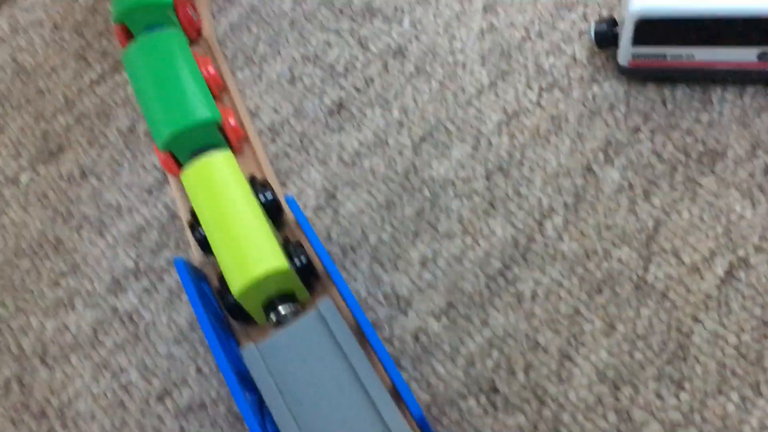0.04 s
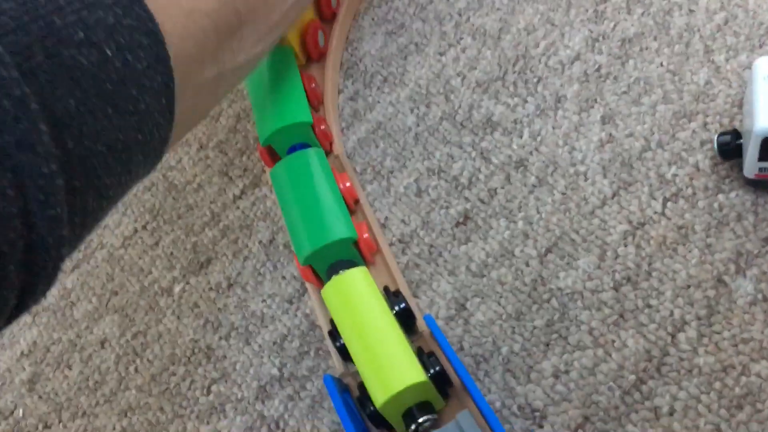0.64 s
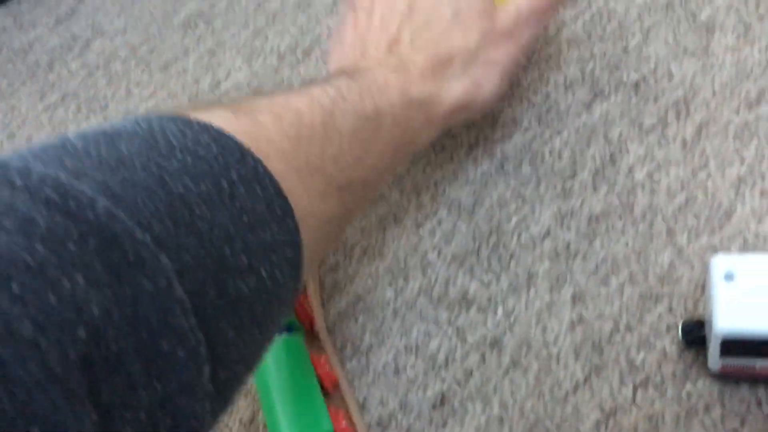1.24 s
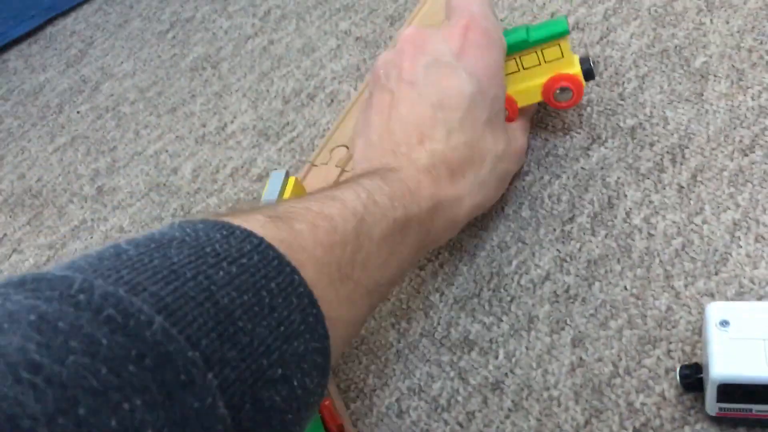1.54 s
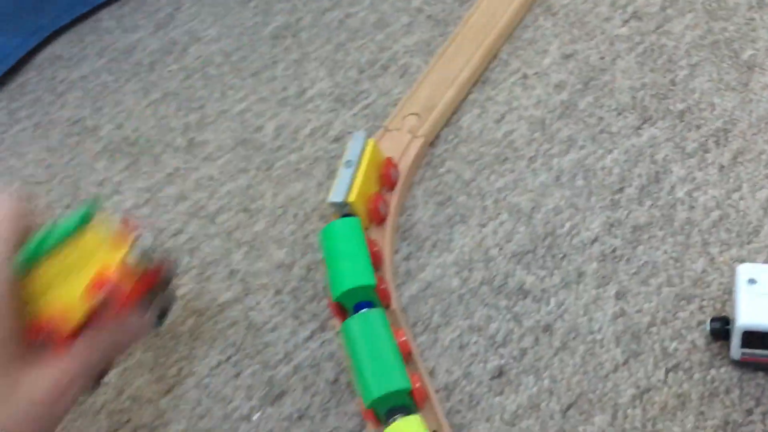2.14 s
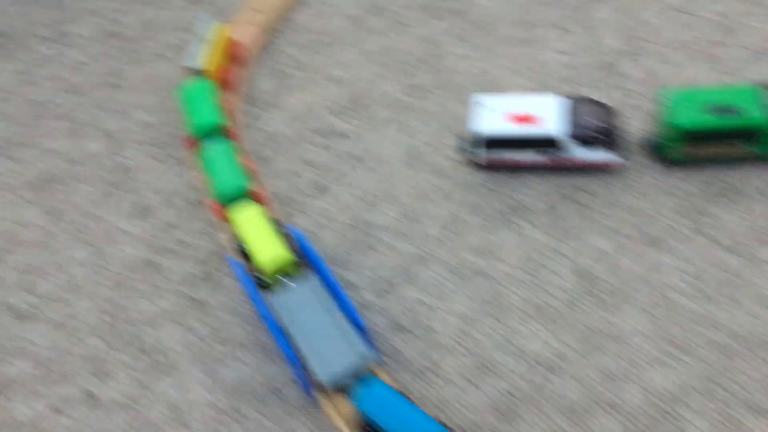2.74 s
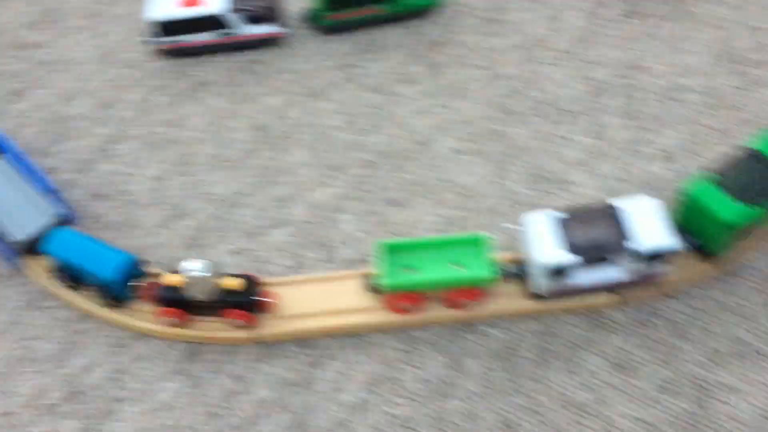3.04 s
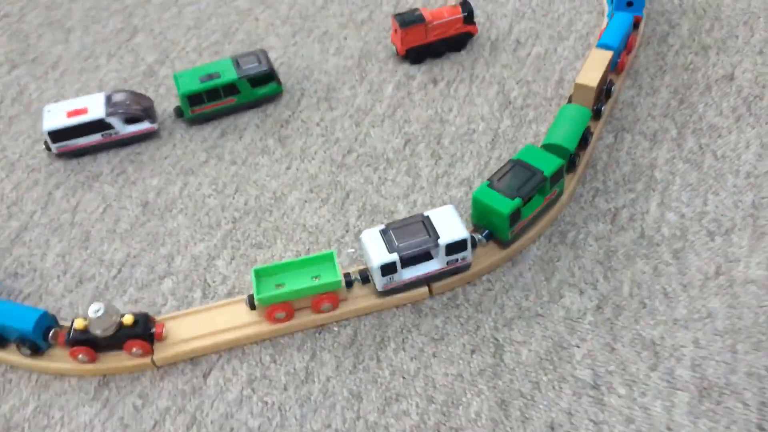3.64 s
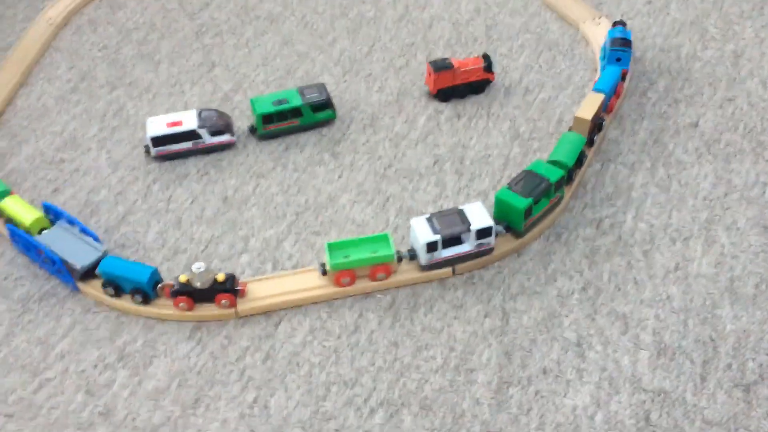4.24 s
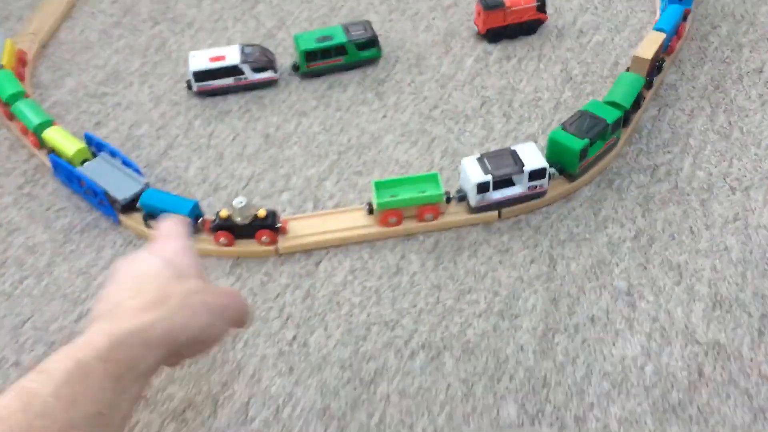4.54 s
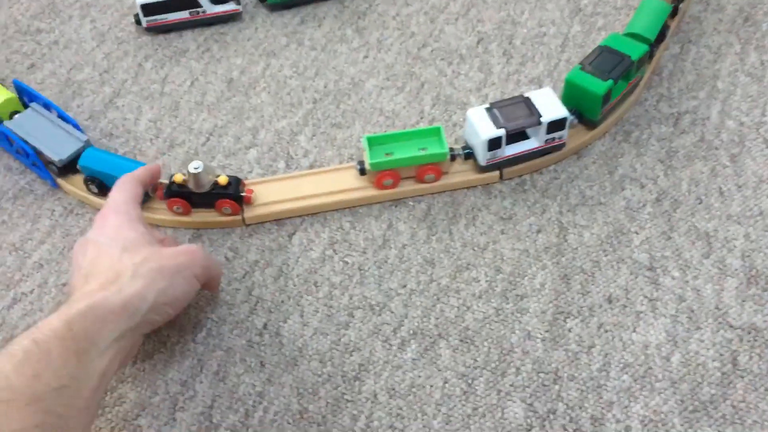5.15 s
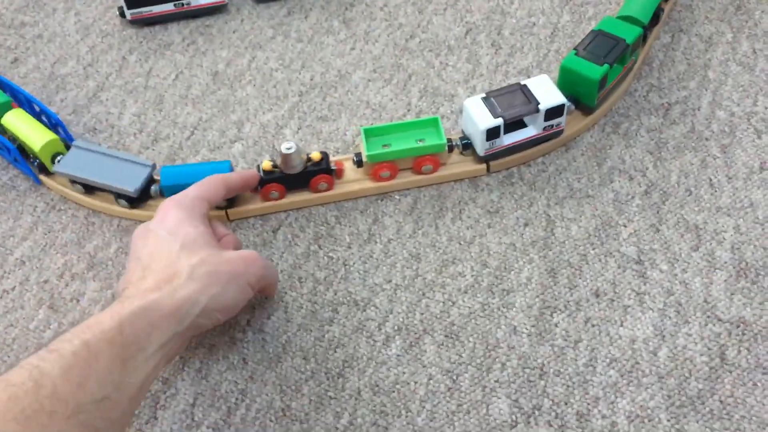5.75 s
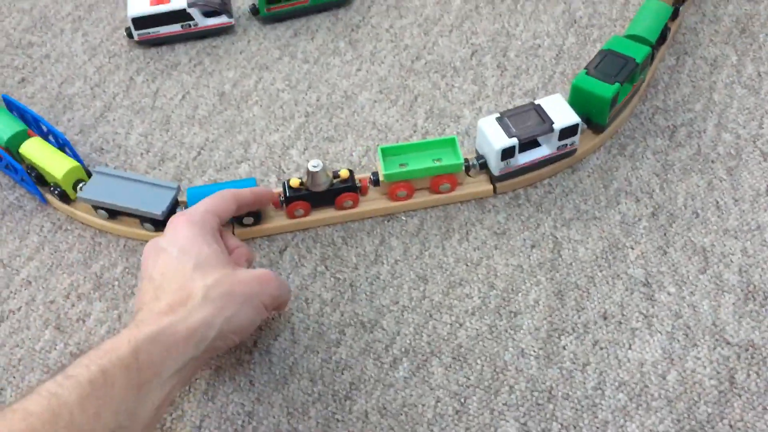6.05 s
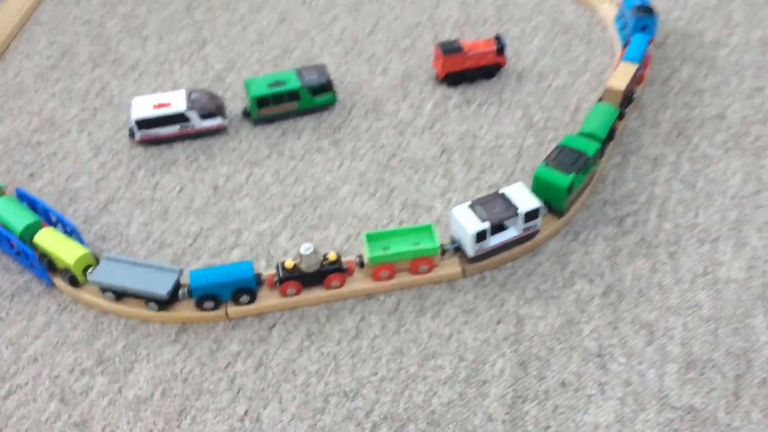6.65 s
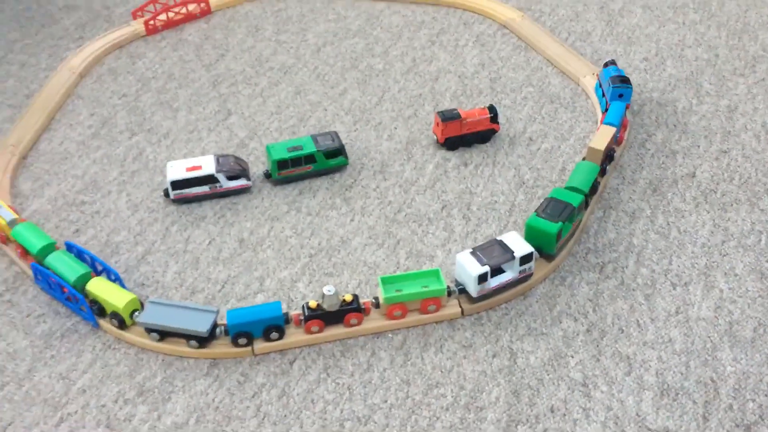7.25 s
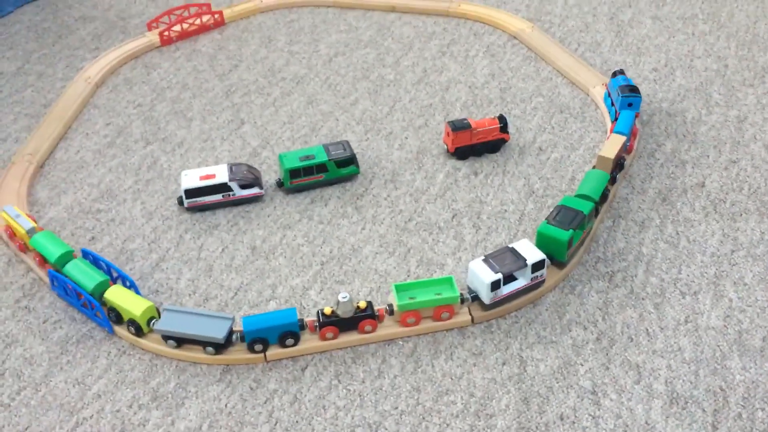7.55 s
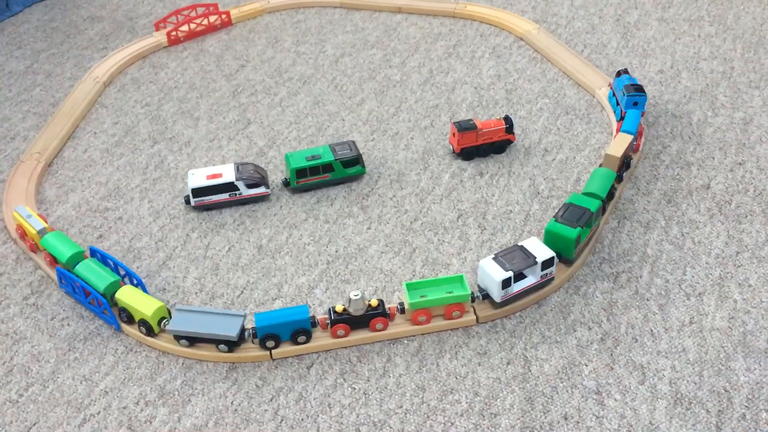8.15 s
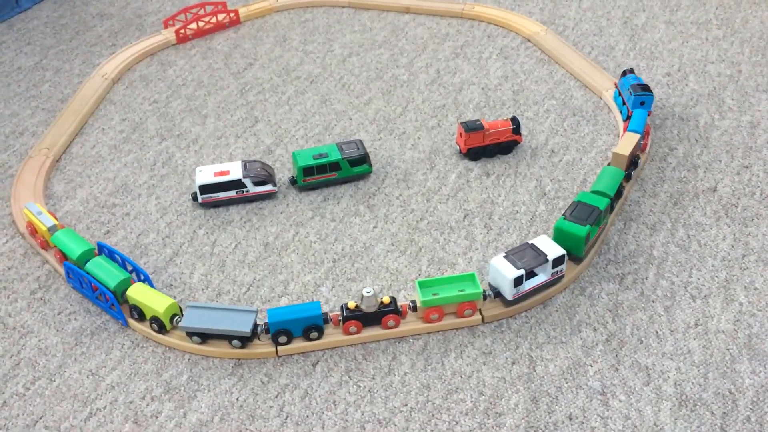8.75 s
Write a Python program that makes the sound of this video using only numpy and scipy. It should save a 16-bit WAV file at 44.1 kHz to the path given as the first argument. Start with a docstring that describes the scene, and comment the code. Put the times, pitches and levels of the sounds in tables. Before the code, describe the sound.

Close wooden toy train cars knock and rattle, then, after faint clothing rustle, roll briefly and click together magnetically.

```python
"""Wooden toy carriages clatter on a wooden track, close by in a carpeted room where a far clock ticks.
One is lifted and, at about 2.5 seconds, set down again. An axle squeaks faintly, then clothes
rustle as the player shifts, with soft bumps. From about 5 seconds the carriages are pushed together:
wheels rumble along the groove, wood knocks, and magnets snap shut and ring.
After a last rustle and two more bumps, only the clock, still air and a faint rumble are left."""
import sys
import numpy as np
from scipy import signal
from scipy.fft import rfft, irfft, next_fast_len
from scipy.io import wavfile

SR = 44100
rng = np.random.default_rng(int(sys.argv[2]) if len(sys.argv) > 2 else 0)


def to_wav(s):
    """Save 16-bit WAV."""
    ch = np.atleast_2d(s).T  # columns
    pcm = np.round(np.clip(ch, -1, 1) * 32767)  # PCM
    wavfile.write(sys.argv[1], SR, pcm.astype(np.int16))


N = 397341
TIME = np.arange(N) / SR

# The tone of still air. Each row: frequency in Hz, relative level in dB.
AIR_TONE = [(25, -7), (75, 0), (140, -5.5), (250, -9), (500, -16.5), (1000, -21), (1700, -21),
            (2200, -20.5), (2800, -24.5), (3700, -23), (4900, -30.5), (5900, -27), (10400, -31),
            (16000, -32)]
# Swells of a faint low rumble. Each row: peak time in seconds, level in dB, length in seconds.
RUMBLE_SWELLS = [(3.8, -71.5, 2.3), (5.05, -63.5, 1.1), (8.05, -68.5, 0.95)]
# Handling that shakes the wheels. Each row: peak time in seconds, level in dB, length in seconds.
SHAKES = [(.005, -45.5, .08), (.33, -58.5, 0.11), (.975, -57.5, .05), (1.06, -60.5, .06),
          (1.39, -52.5, 0.21), (2.73, -47.5, .12)]
# The tone of wood hitting wood. Each row: frequency in Hz, relative level in dB.
CRACK_TONE = [(40, -29), (200, -1), (600, -6), (1200, -0.5), (2200, 0), (4000, 1), (6000, -1.5),
              (8500, -9.5), (10700, -12.5), (13500, -11.5), (16000, -22.5)]
# The notes a carriage rings with. Each row: pitch in Hz, relative level in dB, fade time in seconds.
CARRIAGE_MODES = [(362, -14.5, 0.095), (1042, -8.5, 0.055), (1217.5, -10.5, 0.095), (1326, -5, 0.059),
                  (1802, -5, .03), (2159, -3, 0.024), (2243, -6, 0.072), (2470, -7.5, 0.037),
                  (2975, -14.5, .07), (3124, -4, 0.044), (3343, -1.5, 0.081), (3576, 6, 0.033),
                  (3730, -2, 0.046), (4230, 5.5, 0.019), (5110, 7, 0.023), (5610, -3, 0.043),
                  (6140, -4.5, 0.063), (6630, 1, 0.023), (7960, -7, .025), (8740, -1, 0.024),
                  (9753, -16.5, 0.042)]
# Carriage knocks. Each row: start in seconds, relative level in dB, main ringing pitch in Hz,
# bass and treble shares in dB, rough chatter length in ms, the other axle's delay in ms
# (below -1 it grazes first, above 1 it drops after, otherwise both land together).
CARRIAGE_KNOCKS = [(0.0215, -43.5, 1930, 0.5, -16, 4.2, -15), (0.044, -43, 1240, -0.5, -38.5, 1.74, 0),
                   (0.1214, -50, 1390, -1.5, -8, 0.23, 0), (0.199, -51.5, 4760, -4.5, -7, 0.25, 0),
                   (0.2407, -38.5, 1850, -0.5, -15, 4, 0), (0.3157, -26.5, 2980, -5, -17, 2.8, -22),
                   (0.3252, -32.5, 4870, -3, -12, 1, 6.5), (0.3442, -33.5, 1210, -1.5, -13.5, 3.3, 0),
                   (0.361, -37, 3400, -15.5, -21, 1.5, 0), (0.431, -25.5, 3730, -14.5, -21, 2.3, -2.5),
                   (0.5005, -19.5, 3900, -12.5, -14.5, 2.65, 0), (0.516, -41, 2950, -19, -28, 5.1, 0),
                   (0.5807, -48, 4110, 4.5, -23, 4.8, 0), (0.6013, -30.5, 3980, -16, -15.5, 2.33, 0),
                   (0.665, -31, 4150, -13, -22, 1.48, 0), (0.7656, -51, 2030, -5.5, -6.5, 3.1, 23),
                   (0.8197, -44, 4050, -17, -7, 4.6, -11), (0.8662, -48, 1880, -4.5, -8, 4.7, 0),
                   (0.882, -44.5, 2900, -14, -1.5, 3.1, 0), (0.9654, -40.5, 4380, -21, -5.5, 1.6, -11),
                   (1.0058, -44.5, 5300, -18, -6.5, 1.8, 3), (1.1537, -51, 3680, -10.5, -7.5, 0.93, 0),
                   (1.1741, -31, 2210, -11.5, -11.5, 3.44, 8), (1.2059, -24.5, 4060, -11.5, 0, 2.5, 0),
                   (1.21, -26, 2440, -13, -21.5, 2.97, 0), (1.3304, -34.5, 2200, -21, -17.5, 3.9, 0),
                   (1.341, -34, 3620, -15, -12, 4.8, 0), (1.3488, -33, 2180, -8, -21, 2.4, 9),
                   (1.391, -34.5, 2300, -7.5, -15, 3.9, 0), (1.441, -27, 2040, -8, -3.5, 1.53, 0),
                   (1.6012, -56, 2160, 0.5, -18, 0.52, 0), (1.814, -56.5, 2450, 1, -35, 1.02, 0),
                   (1.9095, -41, 3750, -12.5, -15, 0.46, -21), (1.924, -54, 2190, -5, -8, 1.3, -1),
                   (2.0222, -56.5, 1285, -1.5, -38.5, 1.1, 0), (2.2365, -46.5, 2400, -11, -7.5, 0.34, -9.5),
                   (2.3029, -39, 2210, -15.5, -26.5, 0.92, 0), (2.428, -49.5, 2630, -23, -38.5, 0.87, -20),
                   (2.4933, -34, 3120, -9.5, -20, 1.68, -4.5), (2.5626, -28, 3420, -15.5, -14.5, 0.94, 0),
                   (2.569, -30, 4980, -16, -21, 1, 0), (2.6792, -33.5, 4370, -21.5, -17.5, 2.35, 0),
                   (2.708, -36, 3520, -21, -16.5, 2.3, 3), (2.7498, -33.5, 4480, -11.5, -13.5, 1.77, 8),
                   (2.8741, -25, 4270, -17.5, -7.5, 2.96, 0), (2.906, -30, 2250, -8, -12.5, 2.58, 0),
                   (4.887, -45.5, 6260, -18, -3, 3.4, 0), (5.007, -32.5, 2320, -10, -6, 5, -14),
                   (5.066, -33.5, 4300, -18, -2, 5.65, -6), (5.235, -51.5, 2220, -9, -13, 2.9, 1),
                   (5.355, -50, 1900, -0.5, -26, 1.4, -11.5), (5.408, -52, 6360, -14, 0, 10.5, 0),
                   (5.493, -48.5, 2220, -10, -2, 3, 0), (5.532, -38.5, 2260, -6, 0, 6.1, 0.5),
                   (5.543, -36.5, 4200, -23, -1, 3.4, 0), (5.734, -52.5, 4240, -0.5, -3, 4.3, 0),
                   (5.794, -51.5, 2170, -10, -33, 2.9, 0), (5.8381, -31.5, 4530, -22.5, -4, 1.56, 0),
                   (5.868, -46, 1780, -3.5, -7, 4, -0.5), (6.144, -59, 2240, -0.5, -5, 2.06, 1),
                   (6.185, -62.5, 4700, -5, -7, 5.1, 2)]
# When a carriage is in the hand: start and end in seconds.
LIFTED_SPAN = (1.1, 2.47)
# The tone of sliding cloth. Each row: frequency in Hz, relative level in dB.
CLOTH_TONE = [(88, -14), (150, -7.5), (297, -1.5), (854, -7), (1870, -2.5), (5680, -11), (7770, -16),
              (9260, -13), (10400, -18.5), (14000, -18), (16000, -31)]
# Strokes of a sleeve. Each row: peak time in seconds, level in dB, length in seconds.
SLEEVE_STROKES = [(3.55, -60.5, 0.42), (3.93, -58, 0.45), (4.33, -55.5, 0.48), (4.82, -61.5, 0.48),
                  (6.42, -59.5, 0.41), (6.66, -63, 0.16), (7.05, -72.5, .7)]
# Soft bumps on the floor. Each row: start in seconds, level in dB, pitch in Hz, fade time in seconds.
FLOOR_BUMPS = [(3.487, -64, 291, 0.059), (3.96, -49.5, 66, 0.085), (3.968, -58, 980, 0.0072),
               (6.62, -54, 212, 0.24), (7.035, -70.5, 600, 0.043)]
# Pushes that roll the wheels. Each row: peak time in seconds, level in dB, length in seconds.
PUSHES = [(4.99, -67, 0.7), (5.51, -53.5, 0.37), (5.82, -62, 0.45)]
# Magnets meeting. Each row: start in seconds, level in dB.
MAGNET_SNAPS = [(4.994, -58), (5.068, -63), (5.511, -46.5), (5.543, -31.5)]
# The notes a magnet rings with. Each row: pitch in Hz, relative level in dB, fade time in seconds.
MAGNET_MODES = [(8578, 0, .19), (15324, 0, .19)]


def undb(db):
    """Turn decibels into a number to multiply by."""
    return 10 ** (np.asarray(db) / 20)


def unit(x):
    """Scale a sound to an energy of one."""
    return x / np.sqrt(np.sum(x ** 2) + 1e-20)


def swell(moves, steepness=3.4, rise_share=.36, end_db=-13):
    """Loudness over time: each movement builds quickly to its peak and eases off slowly."""
    power = np.zeros(N)
    for peak_s, db, length_s in moves:
        from_peak = np.maximum((peak_s - TIME) / rise_share, (TIME - peak_s) / (1 - rise_share))
        power += undb(db + end_db * np.minimum(from_peak / length_s, 10) ** steepness) ** 2
    return np.sqrt(power)


def fade(t, t60):
    """Die away by 60 dB in t60 seconds, the fade time."""
    return np.exp(-np.log(1000) * t / t60)


def add(out, start_s, x):
    """Mix a sound in at a given time."""
    i = max(int(start_s * SR), 0)
    out[i:i + len(x)] += x[:len(out) - i]


def colour(x, tone):
    """Shape a sound with a tone table and bring its level to one."""
    hz, db = np.transpose(tone)
    size = next_fast_len(len(x))
    bins_hz = np.maximum(np.fft.rfftfreq(size, 1 / SR), 1)
    gain = undb(np.interp(np.log(bins_hz), np.log(hz), db))
    shaped = irfft(rfft(x, size) * gain, size)[:len(x)]
    return shaped / np.std(shaped)


def resonate(x, hz, width_hz):
    """Let through mainly the sound near one pitch."""
    return signal.lfilter(*signal.iirpeak(hz, hz / width_hz, SR), x)


def room(x, low_t60=0.29, high_t60=0.17, build_s=0.0028, tail_db=-8, wall_db=-20):
    """A near wall echoes; the carpet soon swallows the other reflections, treble first."""
    t = TIME[:SR // 3]
    noise = rng.standard_normal(len(t))
    low = signal.sosfilt(signal.butter(1, 2800, fs=SR, output="sos"), noise)
    tail = low * fade(t, low_t60) + (noise - low) * fade(t, high_t60)
    build_up = 1 - np.exp(-(t / build_s) ** 2)
    response = undb(tail_db) * unit(tail * build_up)
    response[0] += 1  # the direct sound
    add(response, .015, undb([wall_db]))
    return signal.fftconvolve(x, response)[:N]


def background(air_db=-66.5):
    """Still air, and a low rumble that swells now and then."""
    air = colour(rng.standard_normal(N), AIR_TONE) * undb(air_db)
    rumble = resonate(resonate(rng.standard_normal(N), 160, 110), 160, 110)
    return air + rumble / np.std(rumble) * swell(RUMBLE_SWELLS)


def carriage_ring(t, spread_db, detune=.003):
    """A struck carriage rings with many notes; each blow lands elsewhere and changes their mix."""
    hz, db, t60 = np.transpose(CARRIAGE_MODES)[:, :, None]
    weight, shift = rng.standard_normal((2, len(hz), 1))
    notes = np.sin(2 * np.pi * hz * (1 + detune * shift) * t) * rng.choice([-1, 1], hz.shape)
    return np.sum(undb(db + spread_db * weight) * fade(t, t60) * notes, axis=0)


def rattle(per_second=260, spread_db=4, tick_t60=0.006, body_db=-6):
    """Loose wheels and axles tick at random against the carriage."""
    t = TIME[:4096]
    is_tick = rng.random(N) < per_second / SR
    ticks = is_tick * undb(spread_db * np.clip(rng.standard_normal(N), -2, 2))
    bursts = signal.fftconvolve(ticks, fade(t, tick_t60))[:N] * rng.standard_normal(N)
    crack = colour(bursts, CRACK_TONE)
    body = signal.fftconvolve(crack, unit(carriage_ring(t, spread_db=2)))[:N]
    return (crack + undb(body_db) * body / np.std(body)) * swell(SHAKES)


def landings(graze_db=-14, drop_db=-2, chatter_share=.7):
    """List the blows: the other axle may add a lighter, briefer one before or after the main one."""
    for start_s, db, hz, bass, treble, chatter_ms, axle_ms in CARRIAGE_KNOCKS:
        yield start_s, db, hz, bass, treble, chatter_ms
        if abs(axle_ms) > 1:
            axle_db = db + (graze_db if axle_ms < 0 else drop_db)
            yield start_s + axle_ms / 1000, axle_db, hz, bass, treble, chatter_share * chatter_ms


def chatter(t, length_ms, contacts_db=(-4, -2.5, -2, -6), crack_t60=0.009):
    """Four quick cracks: a wheel touches, the body lands, and both bounce."""
    out = np.zeros(len(t))
    delays_s = np.linspace(0, length_ms / 1000, 4) * rng.uniform(.75, 1.25, size=4)
    for db, delay_s in zip(contacts_db, delays_s):
        crack = colour(rng.standard_normal(len(t)), CRACK_TONE) * fade(t, crack_t60)
        add(out, delay_s, undb(db) * unit(crack))
    return out


def soften(x, treble_db, hard_hz=16400, db_per_octave=20.5):
    """A softer contact lasts longer, so it loses more of its treble."""
    cutoff_hz = np.clip(hard_hz * 2 ** (treble_db / db_per_octave), 5000, 16000)
    return signal.sosfilt(signal.butter(2, cutoff_hz, fs=SR, output="sos"), x)


def knocks(block_width_hz=400, block_db=1, body_db=-2, boost_db=26, bass_trim_db=-1):
    """Each blow cracks, then rings the struck block of wood and the whole carriage."""
    out, t = np.zeros(N), TIME[:6144]
    edges_hz = [([90, 1500], "band"), ([1500, 7000], "band"), (7000, "high")]  # bass, middle, treble
    bands = [signal.butter(3, hz, kind, fs=SR, output="sos") for hz, kind in edges_hz]
    for start_s, db, hz, bass_db, treble_db, chatter_ms in landings():
        crack = chatter(t, chatter_ms)
        block = resonate(resonate(crack, hz, block_width_hz), hz, 4 * block_width_hz)
        body = carriage_ring(t, spread_db=3) * (1 - fade(t, .005))  # takes a moment to start
        hit = unit(crack) + undb(block_db) * unit(block) + undb(body_db) * unit(body)
        hit = thin_if_lifted(soften(hit, treble_db), start_s)
        # each knock has its own share of bass and treble
        shares = undb([bass_db + bass_trim_db, 0, treble_db])
        hit = sum(share * unit(signal.sosfilt(band, hit)) for share, band in zip(shares, bands))
        # the toys keep moving, so every knock meets new reflections
        add(out, start_s, undb(db + boost_db) * room(hit))
    return out


def clock(first_s=.47, tick_db=-66):
    """One tick a second from across the room, blurred into a short wash of sound."""
    out, t = np.zeros(N), TIME[:SR // 3]
    wash = fade(t, .3) * (1 - fade(t, .08))
    for start_s in first_s + np.arange(N // SR):
        noise = rng.standard_normal(len(t))
        tick = resonate(noise, 2200, 300) + resonate(noise, 3900, 700)
        tick += undb(-10) * resonate(noise, 9000, 2500)
        add(out, start_s, undb(tick_db) * tick / np.std(tick) * wash)
    return out


def thin_if_lifted(x, start_s, cutoff_hz=447):
    """A carriage in the hand cannot shake the track, so its knocks lose their lowest notes."""
    if not LIFTED_SPAN[0] < start_s < LIFTED_SPAN[1]:
        return x
    return signal.sosfilt(signal.butter(2, cutoff_hz, "high", fs=SR, output="sos"), x)


def squeak(start_s=3.09, length_s=0.14, from_hz=4150, to_hz=3600, db=-63):
    """An axle squeaks faintly in fits, its pitch sagging as the wheel slows."""
    out, progress = np.zeros(N), np.linspace(0, 1, int(length_s * SR))
    slip = np.interp(progress, np.linspace(0, 1, 80), rng.standard_normal(80))
    grip = np.interp(progress, np.linspace(0, 1, 12), rng.standard_normal(12))
    hz = (from_hz + (to_hz - from_hz) * progress) * (1 + .025 * slip)
    tone = np.sin(2 * np.pi * np.cumsum(hz) / SR)
    add(out, start_s, undb(db) * grip * np.sin(np.pi * progress) * tone)
    return out


def friction(catch_db):
    """Sliding noise that catches and slips every few milliseconds."""
    catch_times = TIME[::200]
    catches = np.interp(TIME, catch_times, rng.standard_normal(len(catch_times)))
    return rng.standard_normal(N) * undb(catch_db * catches)


def clothes():
    """Sleeves and trousers slide over the carpet."""
    return colour(friction(catch_db=1), CLOTH_TONE) * swell(SLEEVE_STROKES, steepness=2.36)


def bumps():
    """Dull thuds come through the carpet."""
    out, t = np.zeros(N), TIME[:SR // 3]
    for start_s, db, hz, t60 in FLOOR_BUMPS:
        burst = rng.standard_normal(len(t)) * fade(t, t60)
        thud = resonate(resonate(burst, hz, hz), hz, hz)
        add(out, start_s, undb(db) * thud / np.std(thud[:SR // 30]))
    return out


def wheels(scrape_db=-1, low_hum_db=-7):
    """The grain of the wood shakes the wheels: the track hums low while the axles scrape."""
    grain = rng.standard_normal(N)
    hum = resonate(resonate(grain, 315, 124), 325, 210)
    hum += undb(low_hum_db) * resonate(resonate(grain, 250, 73), 256, 120)
    scrape = colour(friction(catch_db=3), CRACK_TONE)
    return (hum / np.std(hum) + undb(scrape_db) * scrape) * swell(PUSHES)


def magnets():
    """The metal caps that link the carriages ping when they meet."""
    out, t = np.zeros(N), TIME[:SR // 2]
    ping = sum(undb(db) * fade(t, t60) * np.sin(2 * np.pi * hz * t) for hz, db, t60 in MAGNET_MODES)
    for start_s, db in MAGNET_SNAPS:
        add(out, start_s, undb(db) * ping)
    return out


def scene():
    """Mix the toys, the player and the quiet room into one channel."""
    toys = knocks() + room(rattle() + squeak()) + magnets() + wheels()
    return (toys + bumps() + clothes() + clock() + background())[None]


def record(dry):
    """Cut away the highest treble, above 16000 Hz."""
    return signal.sosfilt(signal.ellip(10, .2, 70, 16000, fs=SR, output="sos"), dry)


dry = scene()
out = record(dry)
to_wav(out)
```